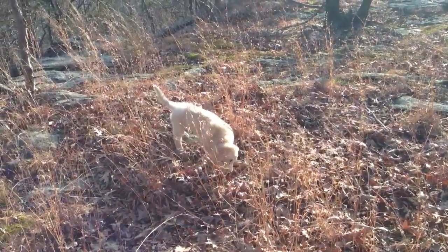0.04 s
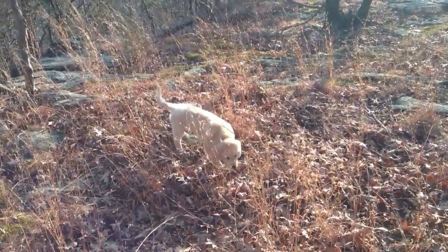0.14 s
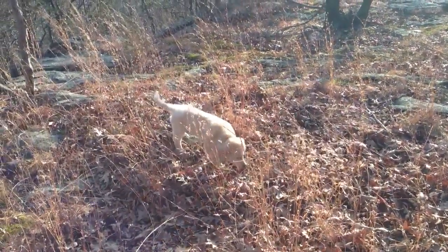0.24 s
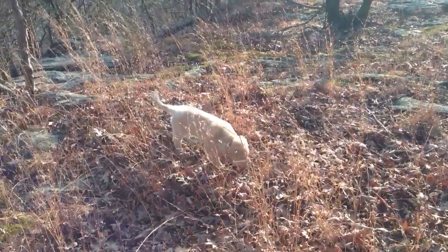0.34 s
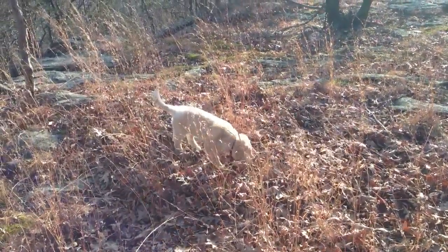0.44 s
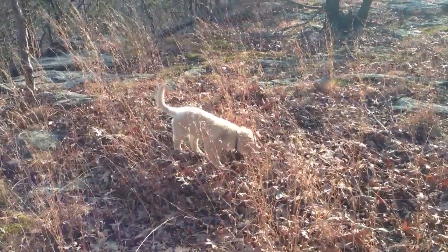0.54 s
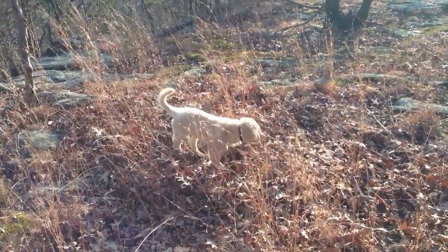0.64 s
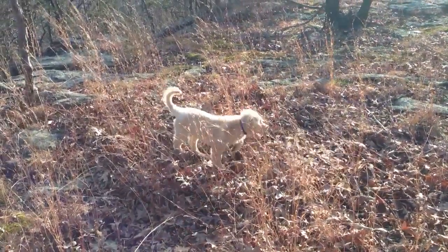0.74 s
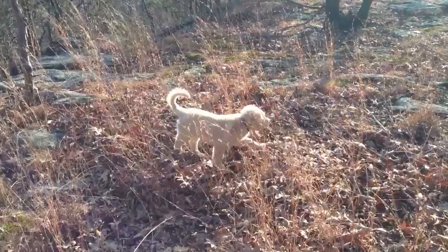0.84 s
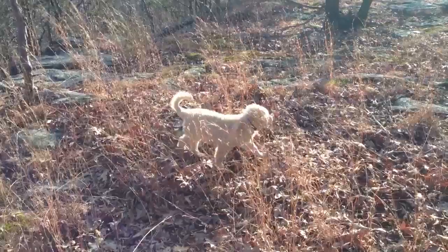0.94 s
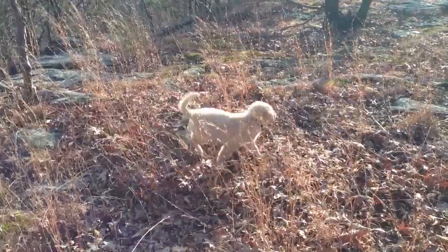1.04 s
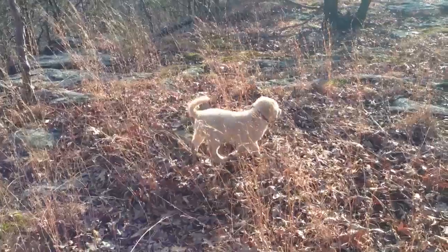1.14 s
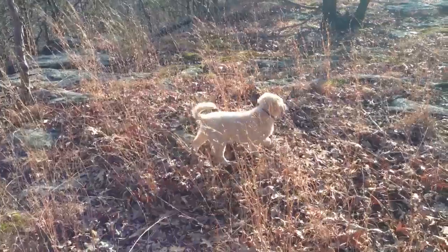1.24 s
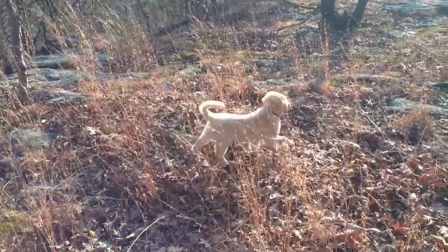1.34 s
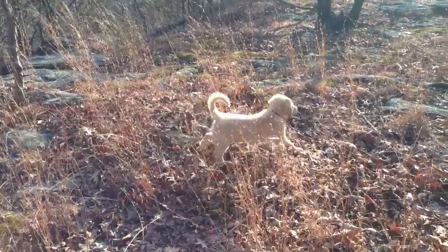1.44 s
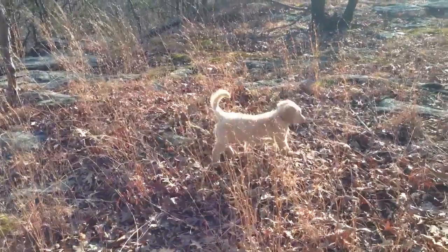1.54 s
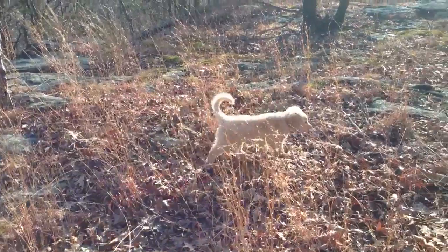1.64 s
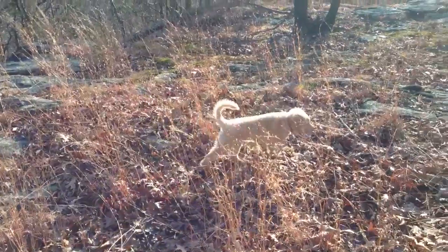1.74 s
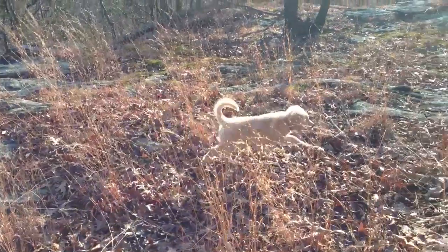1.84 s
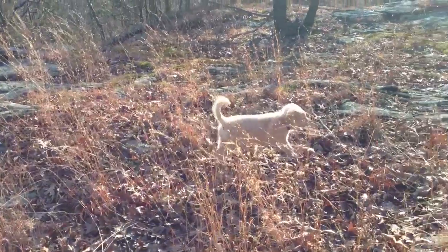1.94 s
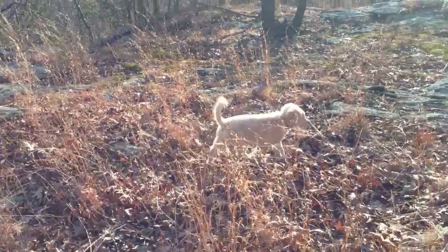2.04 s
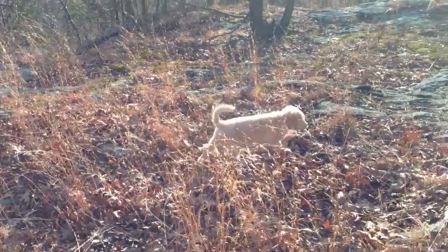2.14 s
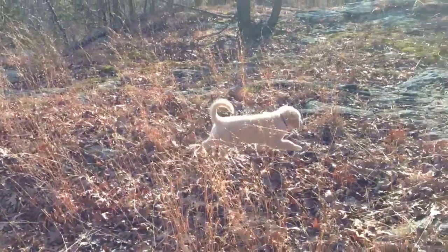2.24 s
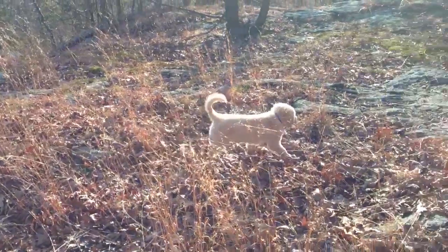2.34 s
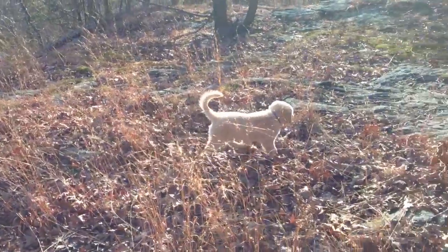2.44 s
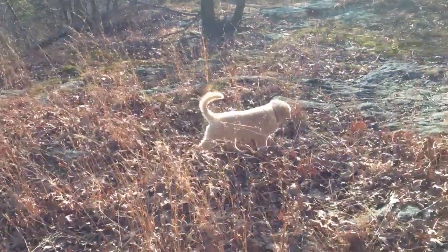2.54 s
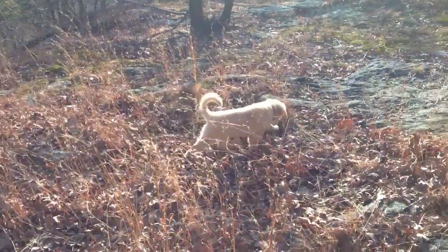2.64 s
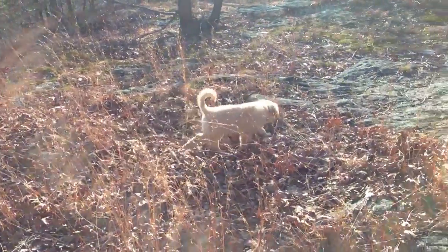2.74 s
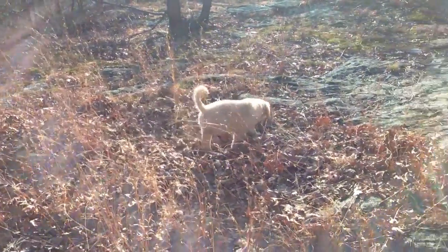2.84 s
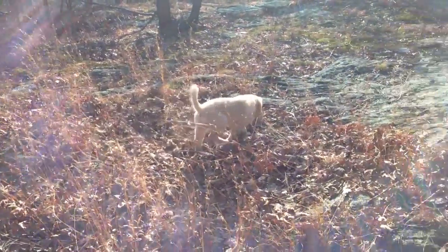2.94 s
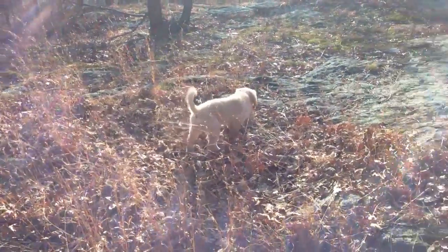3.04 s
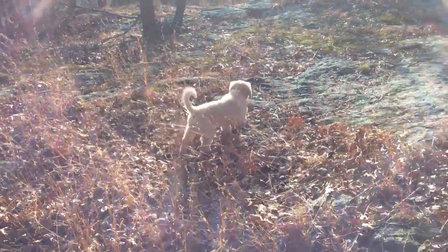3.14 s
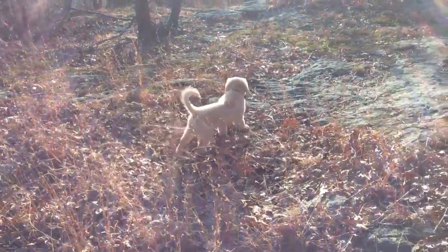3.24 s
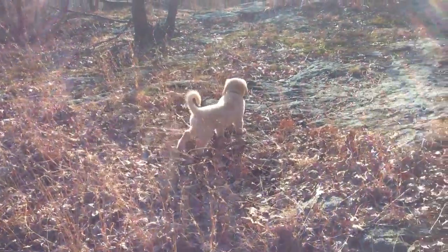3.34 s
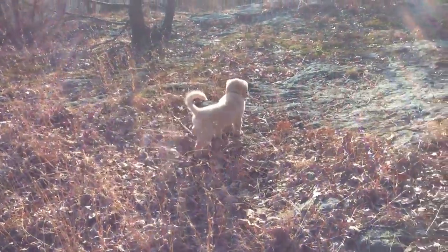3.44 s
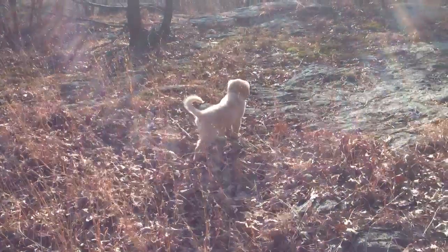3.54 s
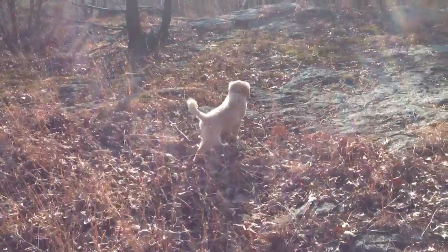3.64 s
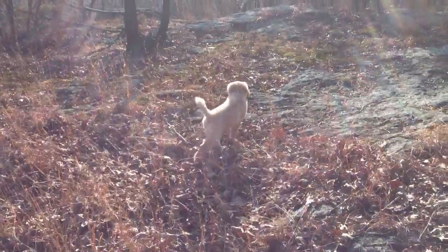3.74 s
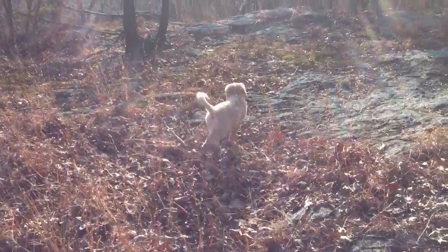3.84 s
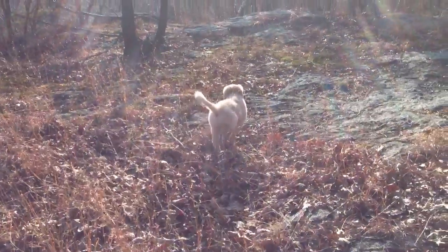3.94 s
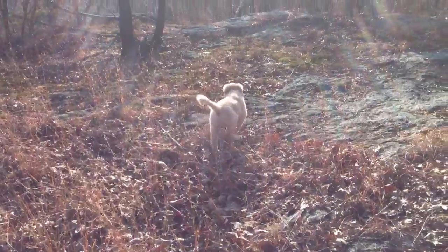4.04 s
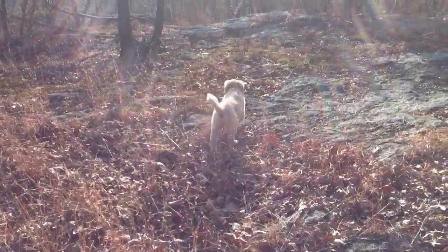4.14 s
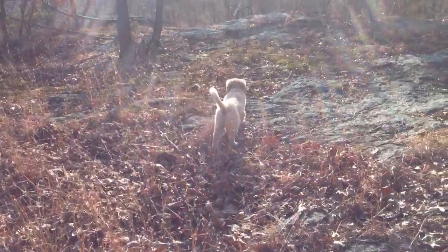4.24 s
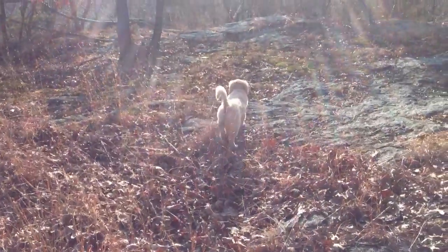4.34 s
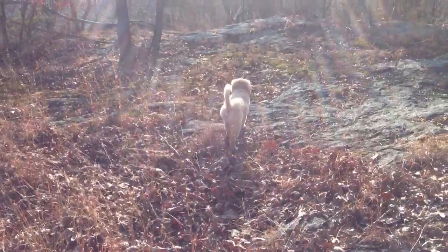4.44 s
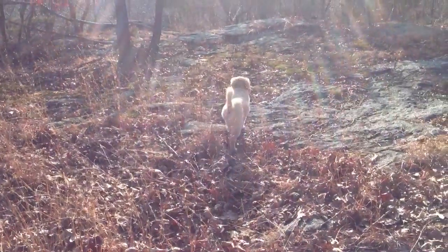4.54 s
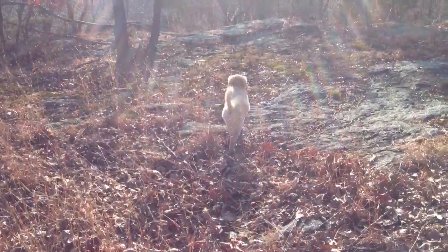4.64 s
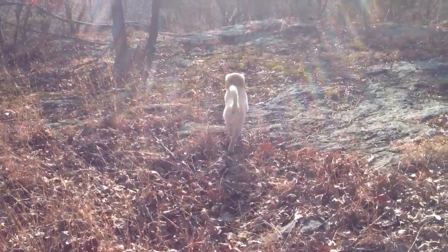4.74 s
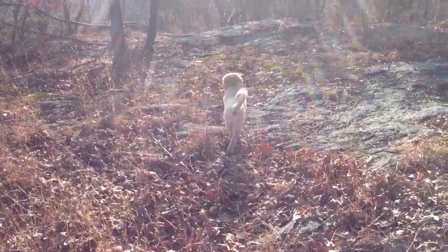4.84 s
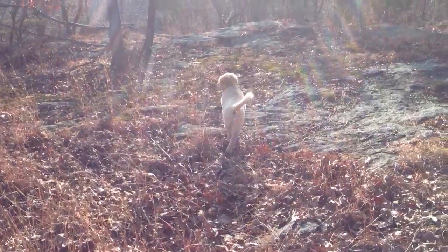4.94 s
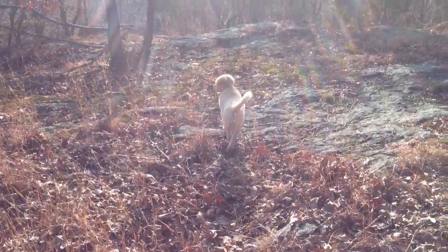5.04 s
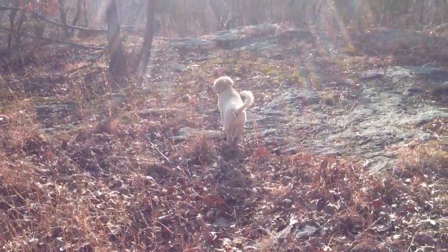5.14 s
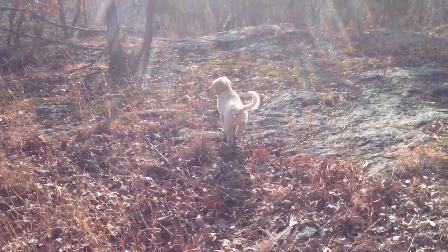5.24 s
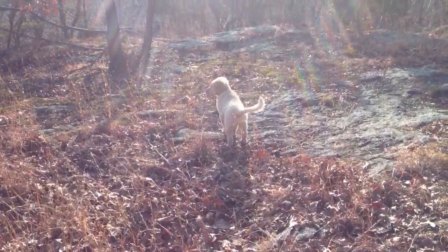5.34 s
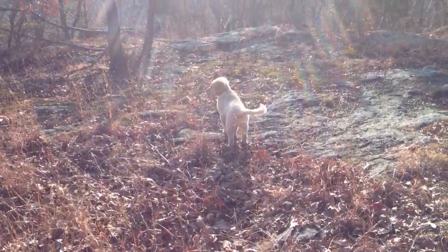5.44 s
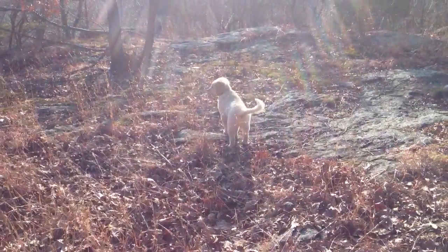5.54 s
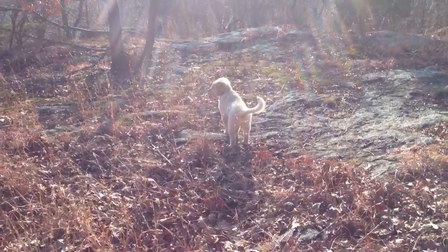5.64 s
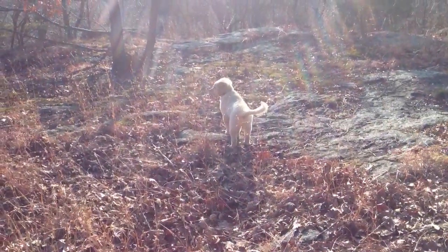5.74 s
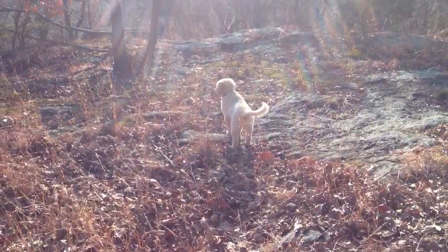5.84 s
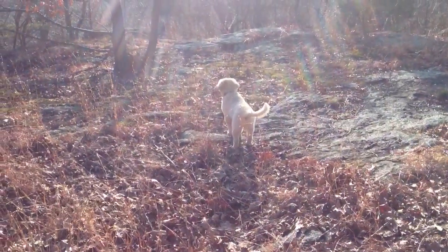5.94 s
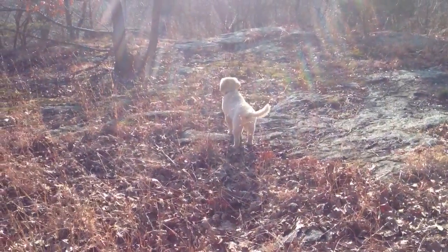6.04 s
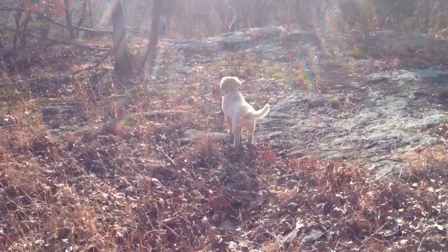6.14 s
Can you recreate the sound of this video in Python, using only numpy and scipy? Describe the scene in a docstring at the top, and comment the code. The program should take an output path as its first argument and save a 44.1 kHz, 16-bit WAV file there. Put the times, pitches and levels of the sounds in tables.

```python
"""Small dog in dry leaves

Open woodland: a small dog trots through dry leaves and dead grass, then slows and stands still.
Each paw crushes the litter in a swarm of tiny fractures, made of random clicks in coloured bands.
Stems and brittle leaves snap singly, as decaying noise bursts with a ring and a woody knock.
Under it lie a low murmur of filtered noise and the gliding tones of far engines.
A few soft bumps of bass noise touch the microphone."""
import sys
import numpy as np
from scipy import signal
from scipy.io import wavfile
from scipy.ndimage import uniform_filter1d

SR = 44100
rng = np.random.default_rng(int(sys.argv[2]) if len(sys.argv) > 2 else 0)


def file_out(sig):
    """Save sig as 16-bit WAV at sys.argv[1]."""
    # one column per channel
    cols = np.atleast_2d(sig).T
    # limit, then scale
    lim = np.clip(cols, -1, 1)
    pcm = np.round(lim * 32767).astype(np.int16)
    wavfile.write(sys.argv[1], SR, pcm)


N = 272964
TIME = np.arange(N) / SR


def from_db(db):
    """Decibels to gain."""
    return 10 ** (np.asarray(db) / 20)


def rms_one(x):
    """Scale to unit rms."""
    return x / np.sqrt(np.mean(x ** 2) + 1e-20)


def in_time(rows):
    """Each column of a curve, interpolated at every sample."""
    s, *columns = np.transpose(rows)
    return [np.interp(TIME, s, column) for column in columns]


def at_hz(points, hz):
    """Read a spectrum on a log-frequency axis."""
    points_hz, points_db = np.array(points).T
    return np.interp(np.log(hz), np.log(points_hz), points_db)


def band(x, low_hz, high_hz):
    """Causal band-pass."""
    edges = [low_hz, min(high_hz, SR / 2 - 100)]
    return signal.sosfilt(signal.butter(2, edges, "band", fs=SR, output="sos"), x + 1e-18)


def bands(low_hz, high_hz, count):
    """Rows of (lower edge, centre, upper edge) [Hz], even in pitch."""
    edges = np.geomspace(low_hz, high_hz, count + 1)
    return zip(edges, np.sqrt(edges[:-1] * edges[1:]), edges[1:])


def drift(rate_hz):
    """Smooth random wandering of unit rms: slow noise through two equal low-pass poles."""
    step = 40   # samples between slow values
    pole = np.exp(-2 * np.pi * rate_hz * step / SR)
    noise = rng.standard_normal(N // step + 2002)
    slow = signal.lfilter([1], [1, -2 * pole, pole * pole], noise)[2000:]   # drop the filter's run-in
    return np.interp(np.arange(N) / step, np.arange(len(slow)), rms_one(slow))


# still woodland air, its spectrum: (frequency [Hz], relative level per Hz [dB])
AIR_SPECTRUM = [(25, -22), (55, -48), (80, -11.5), (105, -6), (145, 0.5), (220, -1), (330, -5), (450, -10),
                (850, -9), (1300, -21.5), (2500, -20), (5000, -20), (9000, -23), (15500, -21.5)]
# the murmur swells and sinks: (time [s], level [dB])
AIR_LEVEL = [(0, -62), (.5, -62.5), (1, -64), (2, -64.5), (3, -63), (3.5, -66), (4.2, -62), (4.8, -65),
             (5.5, -63.5), (6.19, -62.5)]


def air(flutter_db):
    """Low outdoor murmur with a faint hiss: noise bands that flutter separately under one slow swell."""
    murmur, white = 0, rng.standard_normal((2, N))
    for k, (low, hz, high) in enumerate(bands(22, 16000, count=26)):
        gain = from_db(at_hz(AIR_SPECTRUM, hz) + flutter_db * drift(10.7))
        murmur = murmur + gain * band(white[k % 2], low, high)   # neighbouring bands use different noise
    level_db, = in_time(AIR_LEVEL)
    return from_db(level_db) * rms_one(murmur)


# far engines, carried in and out, each tone at half height at its start and end:
# (start time [s], end time [s], start frequency [Hz], end frequency [Hz], level before fading [dB])
ENGINE_TONES = [(0, 2.3, 139.5, 141.8, -77), (0, .22, 267.4, 276, -69.5), (.6, 1.07, 201.7, 204.4, -70.5),
                (1.098, 2.7, 373, 380, -77.5), (2.55, 2.75, 265, 267.3, -71), (2.7, 3.9, 361, 355, -78),
                (3.0, 3.9, 275, 279.8, -72.5), (2.95, 3.4, 199.2, 198, -77), (4.1, 5.0, 376, 371, -79),
                (4.5, 5.2, 281, 281, -73), (4.85, 5.25, 199.4, 200, -71), (4.998, 5.95, 280.4, 282, -67),
                (5.05, 5.7, 363.4, 364, -75), (5.7, 6, 199, 198.7, -70), (5.85, 5.9, 272, 276, -69)]


def far_engines(waver_hz, fade_db, flutter_rad, swell_s):
    """Tones of far engines come and go, gliding and wavering on their way through the trees."""
    hum = 0
    for start, end, start_hz, end_hz, db in ENGINE_TONES:
        hz = np.interp(TIME, [start, end], [start_hz, end_hz]) + waver_hz * drift(5.7)
        swell = np.clip(.5 + np.minimum(TIME - start, end - TIME) / swell_s, 0, 1)
        phase = 2 * np.pi * np.cumsum(hz) / SR + flutter_rad * drift(30)   # many paths blur each line
        level = from_db(db + fade_db * drift(15))
        hum = hum + swell * level * np.sqrt(2) * np.sin(phase)
    return hum


def held(start, length, attack_s, release_s):
    """Rise around the start, hold, then die away."""
    rise = np.clip(.5 + (TIME - start) / attack_s, 0, 1)
    return rise * np.exp(-np.maximum(TIME - start - length, 0) / release_s)


# between steps, legs and belly keep stirring the grass:
# (time [s], level [dB], hollow body re that level [dB])
STIR = [(0, -50.5, -0.5), (.04, -60.5, 5.5), (.2, -63, 13.5), (.75, -54, 5.5), (.92, -59.5, 9),
        (1.1, -50, 9.5), (1.47, -53, 1.5), (1.69, -43.5, 2.5), (1.88, -51, 2.5), (2.04, -44.5, 6),
        (2.28, -46, 2), (2.55, -42.5, 4), (2.92, -53, 4), (3.75, -50, 4), (4.55, -57, 0.5),
        (4.78, -65.5, 4.5), (5.07, -61, 1.5), (5.33, -70, -14), (6.19, -81, -3)]
# a leg sweeps through the litter: (start time [s], length [s], level [dB],
# hollow body under about 3 kHz re that level [dB], crisp top over about 9 kHz re that level [dB])
STEPS = [(0.056, 0.056, -60.5, 13.5, -12), (0.104, 0.034, -55.5, 12, -15), (0.2, 0.17, -60.5, 13, -20),
         (0.371, 0.11, -56, 13.5, -12), (0.552, 0.078, -50, 5, -16), (0.708, 0.083, -53, 7.5, -1),
         (0.938, 0.013, -51.5, 7.5, -6), (0.973, 0.1, -44.5, 3.5, -1.5), (1.159, 0.094, -47.5, 2, -1),
         (1.247, 0.066, -45.5, 4, -1), (1.378, 0.049, -49.5, 3.5, 2), (1.517, 0.14, -53, 9, 6),
         (1.621, 0.032, -36.5, -1, -4), (1.678, .025, -50, 3, 1), (1.725, 0.046, -43, 4.5, 3.5),
         (1.958, 0.032, -41.5, 4, -2), (2.13, 0.077, -34, 3.5, -0.5), (2.21, 0.029, -38.5, 5, 0),
         (2.332, 0.094, -45.5, 8, -0.5), (2.55, 0.11, -44.5, 8.5, -0.5), (2.687, 0.041, -44.5, 0, 4),
         (2.74, 0.09, -46, 3.5, -1), (2.846, .05, -60, 9, 0), (2.999, 0.11, -48.5, 6, -1.5),
         (3.053, 0.13, -45, 1.5, -1.5), (3.274, 0.087, -47.5, 2.5, 0.5), (3.363, 0.12, -48.5, 5.5, -4),
         (3.57, 0.17, -48.5, 1, 1.5), (3.682, .045, -46, 5, 1.5), (3.789, 0.083, -50, 4.5, -0.5),
         (3.96, 0.11, -57, 7.5, 6), (4.06, .08, -69.5, -6, 13), (4.148, 0.11, -50.5, 0, 2),
         (4.287, 0.077, -51.5, 5.5, 1.5), (4.383, 0.12, -55.5, 0, 4), (4.601, 0.066, -55.5, 5, -3),
         (4.643, 0.065, -49.5, 2.5, -7), (4.871, 0.023, -47.5, 4, 0), (5.01, 0.018, -62, -2, -1),
         (5.104, 0.081, -55.5, 4, 4.5), (5.257, .008, -56.5, 5, 1), (5.429, 0.079, -56, 1, 0.5),
         (5.506, 0.025, -63, 2, -4)]
# a paw breaks through a curled leaf: (time [s], length [s], level [dB])
CRUNCHES = [(0.432, .004, -63), (0.644, 0.033, -46.5), (0.987, .012, -55), (1.349, .003, -42),
            (1.59, 0.0052, -42), (1.648, 0.019, -38.5), (2.131, 0.035, -36), (2.376, 0.0091, -32.5),
            (2.396, 0.016, -36), (3.064, 0.021, -46), (3.145, 0.014, -46), (3.922, 0.024, -47.5),
            (3.963, .007, -47), (4.867, 0.014, -50), (5.105, 0.018, -55)]


def footwork(stir_crisp_db=-1, sink_s=.021, settle_s=.013, crunch_rise_s=.002, crunch_fall_s=.01):
    """Gain of the litter's body, middle and top: stirring, steps and crushed leaves add in power."""
    stir_db, hollow_db = in_time(STIR)
    power = from_db([stir_db + hollow_db, stir_db, stir_db + stir_crisp_db]) ** 2
    for s, length, db, body_db, crisp_db in STEPS:
        # the paw sinks in, then the leaves spring back and settle
        sweep = held(s, length, sink_s, settle_s)
        power += (from_db([[db + body_db], [db], [db + crisp_db]]) * sweep) ** 2
    for s, length, db in CRUNCHES:
        rise = (TIME - s) / crunch_rise_s
        fall = 1 + (s + length - TIME) / crunch_fall_s
        power += (from_db(db) * np.clip(np.minimum(rise, fall), 0, 1)) ** 2
    return np.sqrt(power)


# colour of the leaf litter: (frequency [Hz], relative level per Hz [dB])
LITTER_SPECTRUM = [(250, -25), (500, -16), (1050, -11.5), (1500, -10), (1950, -4.5), (2400, -6.5),
                   (2950, -9.5), (3800, 0), (4750, 3), (5750, 2), (6750, -4.5), (7600, -0.5), (9700, -2),
                   (11300, -7), (15500, -8)]


def fractures(crowding, per_s, size_db, clump_db, colour_db, fine_db, tail_s, tail_db, patchy_db=1.82):
    """Clumps of tiny breaks, each with its own colour, over fine friction; (Hz, sound) per band, rms 1 in all."""
    born = rng.random(N) < per_s / SR
    # under a heavy paw so many leaves break at once that single ones stand out less
    spread_db = size_db * np.minimum(rng.exponential(1, N), 3.5) + clump_db * drift(120)
    sizes = born * from_db((1 - crowding) * spread_db)
    # level out over 31 ms, so the stride alone sets the loudness
    sizes /= np.sqrt(uniform_filter1d(sizes ** 2, SR // 32) + 1e-9)
    keep = np.exp(-1 / (tail_s * SR))
    place = rng.random(N)[born]
    layers = []
    for low, hz, high in bands(250, 16000, count=36):
        clicks = np.zeros(N)
        # each fragment favours its own pitches, about an octave and a half apart
        favour = np.cos(2 * np.pi * (np.log2(hz) / 1.497 + place))
        clicks[born] = sizes[born] * rng.choice([-1, 1], N)[born] * from_db(colour_db * favour)
        clicks = rms_one(clicks)
        # neighbouring leaves scatter each break into a short hiss
        tail_power = signal.lfilter([1 - keep], [1, -keep], clicks ** 2 + 1e-12)
        hiss = np.sqrt(from_db(fine_db) ** 2 + from_db(tail_db) ** 2 * tail_power)
        grains = clicks + hiss * rng.standard_normal(N)
        colour = from_db(at_hz(LITTER_SPECTRUM, hz) + patchy_db * drift(14.0))
        layers.append((hz, colour * band(grains, low, high)))
    total = np.sqrt(sum(np.mean(x ** 2) for hz, x in layers))
    return [(hz, x / total) for hz, x in layers]


def paws(body, middle, top):
    """Legs sweep the litter: deep leaves sound hollow, dry tops crisp."""
    rustle = 0
    # evening-out of fragment sizes grows from 0 to 0.3 as the middle gain climbs from -42 to -35 dB
    crowding = np.interp(20 * np.log10(middle), [-42, -35], [0, .3])
    swarm = fractures(crowding, per_s=2200, size_db=3.8, clump_db=.7, colour_db=4.5,
                      fine_db=-5, tail_s=.002, tail_db=-2.5)
    for hz, grains in swarm:
        hollow = np.interp(hz, [2600, 3900], [1, 0])
        crisp = np.interp(hz, [6500, 11500], [0, 1])
        rustle = rustle + grains * (hollow * body + crisp * top + (1 - hollow - crisp) * middle)
    return rustle


def fine_stems(push):
    """Random small breaks whose strength follows the legs; rows as in SNAPS."""
    per_s, level_db, spread_db, max_db = 14, -6.5, 2, -46   # level re the rustle's middle gain
    low_hz, high_hz, knock_db = 3800, 8500, -16
    count = int(per_s * N / SR)
    s = rng.uniform(0, TIME[-SR // 30], count)
    db = 20 * np.log10(np.interp(s, TIME, push)) + level_db + spread_db * rng.standard_normal(count)
    hz = rng.uniform(low_hz, high_hz, count)
    return list(zip(s, np.minimum(db, max_db), hz, np.full(count, knock_db)))


# single stems and leaf ribs breaking: (time [s], level of crack and ring if spread over 4 ms [dB],
# ring frequency [Hz], woody knock re that level [dB])
SNAPS = [(.2625, -53, 4800, -8), (.321, -53, 3400, -3), (.4325, -51, 6200, -6), (.5995, -50, 5200, -12),
         (.6493, -42, 4400, -27), (.6732, -41, 8100, -15), (.8965, -53, 4800, -12), (.9758, -45, 7200, -14),
         (1.007, -41.5, 9200, -11), (1.0371, -43, 5200, -14), (1.093, -45.5, 7900, -17),
         (1.3205, -46.5, 2200, 0), (1.3562, -41, 7600, -9), (1.3649, -46.5, 3700, -12),
         (1.4063, -47, 5500, -14), (1.4652, -51, 7800, -9), (1.573, -44, 8500, -14),
         (1.6021, -42, 3700, -1), (1.606, -43, 3000, 0), (1.6305, -39, 8000, -16), (1.6575, -37, 8000, -15),
         (1.6627, -33, 5800, -19), (1.7572, -42, 7000, -18), (1.768, -39, 4900, -16),
         (1.8008, -40.5, 10000, -22), (1.8211, -31.5, 5100, -16), (1.8415, -48.5, 4500, -18),
         (1.8742, -48, 4500, -10), (1.9336, -47.5, 4200, -11), (1.9795, -38, 6200, -12),
         (2.0286, -37, 6300, -18), (2.093, -38, 4700, -5), (2.1675, -35, 5500, -14),
         (2.1925, -36, 4100, -12), (2.2432, -37, 5100, -16), (2.3766, -37, 8000, -14),
         (2.4045, -32, 3800, -13), (2.4105, -39, 6000, -12), (2.457, -41, 4500, -7),
         (2.4913, -35, 5100, -4), (2.4935, -40, 4500, -4), (2.4998, -39, 4200, -14),
         (2.507, -43, 4800, -13), (2.5288, -41, 5600, -17), (2.6215, -42, 4300, -13),
         (2.6345, -38, 4800, -10), (2.653, -43, 4000, -7), (2.689, -43, 7500, -16),
         (2.7403, -42, 3800, -21), (2.846, -42, 5100, -17), (2.988, -48, 4400, -15),
         (3.152, -41, 5000, -14), (3.3015, -45, 4800, -14), (3.371, -45.5, 4500, -12),
         (3.4796, -46.5, 4700, -13), (3.5058, -45, 4400, -16), (3.5883, -44, 3900, -16),
         (3.602, -44, 4800, -15), (3.7155, -41, 4600, -14), (3.748, -48, 4600, -15),
         (3.8587, -46, 5000, -6), (3.9281, -43, 8500, -16), (3.935, -40, 8500, -15),
         (3.9372, -40, 4900, -11), (3.9645, -50, 8000, -15), (3.9762, -46.5, 5200, -11),
         (4.2573, -45, 5200, -14), (4.301, -49, 5400, -15), (4.4495, -48, 9000, -16),
         (4.6005, -49, 4700, -9), (4.6903, -47, 4500, -9), (4.7103, -51, 3500, -20),
         (4.7457, -58, 4800, -12), (4.841, -54, 4800, -10), (4.8575, -50, 5000, -17),
         (4.8734, -42, 5800, -9), (4.8941, -46, 8100, -13), (5.0081, -52, 9400, -22),
         (5.0186, -51, 5600, -14), (5.0345, -56, 7500, -15), (5.0585, -57.5, 5400, -10),
         (5.0889, -56, 5500, -15), (5.1095, -56, 4700, -10), (5.1405, -51, 4500, -9),
         (5.2405, -61, 5500, -12), (5.262, -55, 4700, -4), (5.2945, -63, 5700, -6),
         (5.4935, -54, 6000, -13), (5.5484, -63, 5400, -11), (5.5688, -62, 5700, -17),
         (5.608, -63, 5200, -17)]


def snaps(push, crack_t60_s, tail_t60_s, tail_db, ring_q, ring_db, knock_t60_s, knock_hz, top_hz):
    """A break is a bright crack, a brief ring of the stem and a lower woody knock, all gone in milliseconds."""
    breaks = SNAPS + fine_stems(push)
    out, t = np.zeros(N), TIME[:SR // 40]
    decay = from_db(-60 * t / np.array([[crack_t60_s], [crack_t60_s], [knock_t60_s]]))
    tail = from_db(tail_db - 60 * t / tail_t60_s)   # scattered by the litter around
    per_4_ms = np.sqrt(.004 / t[-1])
    soften = signal.butter(1, min(top_hz, 15000), fs=SR, output="sos")
    half_width = 1 / (2 * ring_q)
    noise = rng.standard_normal((len(breaks), 3, len(t)))
    for (s, db, hz, woody_db), chance in zip(breaks, noise):
        burst = chance * (decay + tail)
        burst[:2, 0] = 2   # crack and ring start on a fixed sharp impulse
        crack = signal.sosfilt(soften, band(burst[0], 4200, 12700))
        ring = band(burst[1], hz * (1 - half_width), hz * (1 + half_width))
        knock = signal.lfilter(*signal.iirpeak(knock_hz, 2, fs=SR), band(burst[2], 530, 2600))
        bright = rms_one(rms_one(crack) + from_db(ring_db) * rms_one(ring))
        snap = bright + from_db(woody_db) * rms_one(knock)
        at = round(s * SR)
        out[at:at + len(t)] += from_db(db) * per_4_ms * snap
    return out


# soft low bumps of air and handling on the microphone:
# (time [s], half width [s], level [dB], centre frequency [Hz])
BUMPS = [(1.46, 0.054, -73, 145), (2.403, 0.014, -73, 62), (3.822, 0.057, -56.5, 154),
         (3.964, 0.0077, -54, 165)]


def bumps():
    """Short, soft blusters at the microphone: bass noise under bell-shaped swells."""
    out = 0
    for s, width, db, hz in BUMPS:
        rumble = band(rng.standard_normal(N), 0.76 * hz, 1.62 * hz)
        rumble = band(rumble, 0.59 * hz, 4.3 * hz)
        swell = np.exp(-.5 * ((TIME - s) / width) ** 2)
        out = out + from_db(db) * swell * rms_one(rumble)
    return out


def scene():
    """The dog in the litter, over the sound of the woods."""
    woods = air(flutter_db=2.16) + far_engines(waver_hz=1.82, fade_db=2.5, flutter_rad=0.37, swell_s=.24)
    body, middle, top = footwork()
    stems = snaps(middle, crack_t60_s=.005, tail_t60_s=.018, tail_db=-18, ring_q=3, ring_db=-1,
                  knock_t60_s=.008, knock_hz=2050, top_hz=14000)
    return (woods + paws(body, middle, top) + stems + bumps())[None]


def record(dry):
    """A steep elliptic low-pass cuts the top above 15.28 kHz."""
    return signal.sosfilt(signal.ellip(12, .1, 75, 15280, fs=SR, output="sos"), dry)


dry = scene()
out = record(dry)
file_out(out)
```